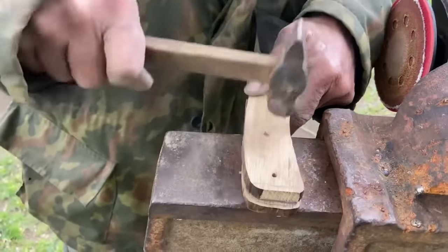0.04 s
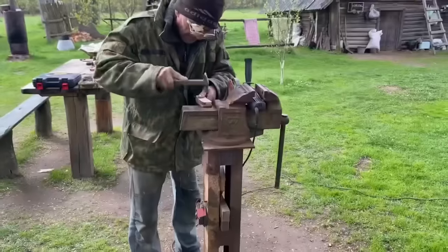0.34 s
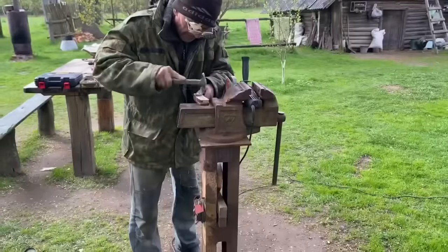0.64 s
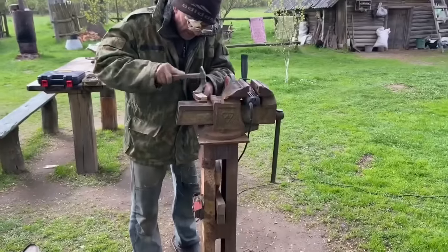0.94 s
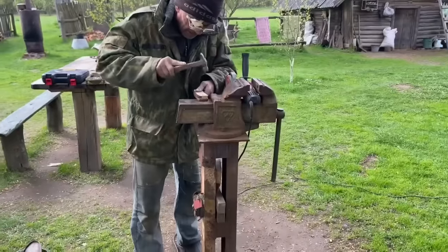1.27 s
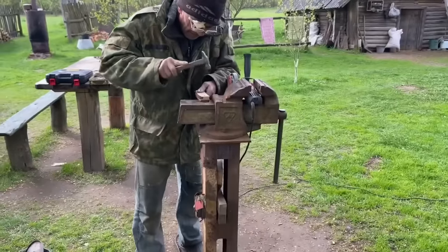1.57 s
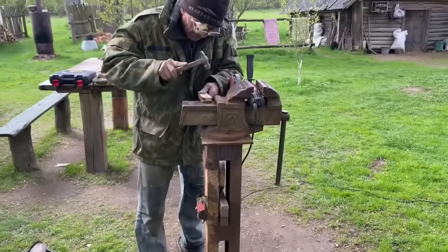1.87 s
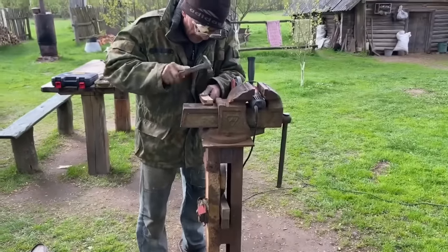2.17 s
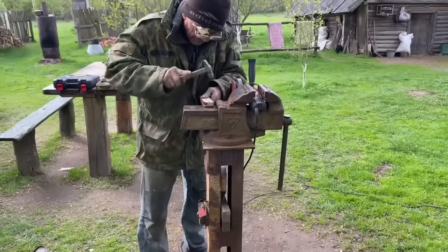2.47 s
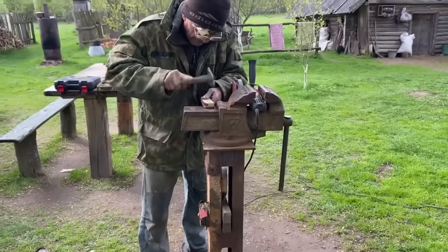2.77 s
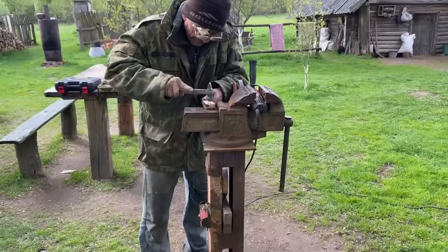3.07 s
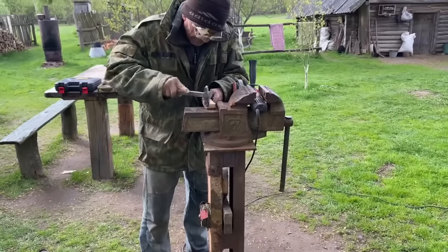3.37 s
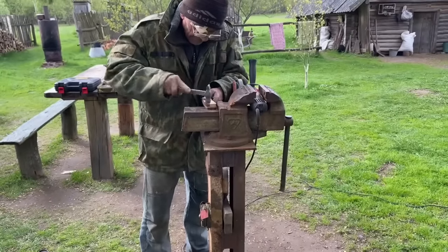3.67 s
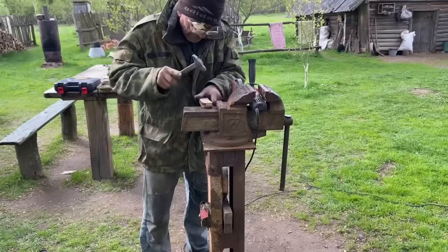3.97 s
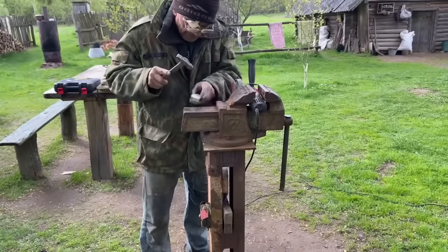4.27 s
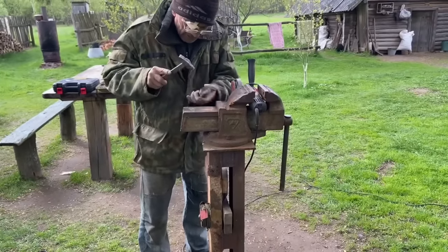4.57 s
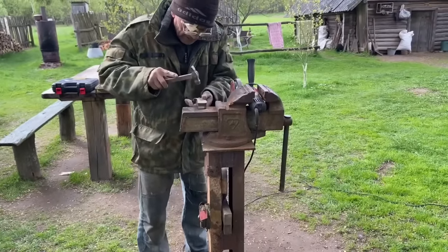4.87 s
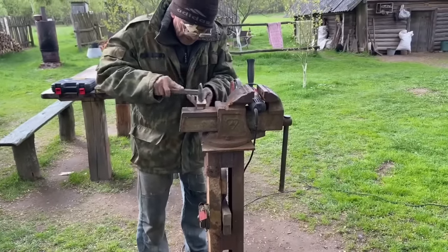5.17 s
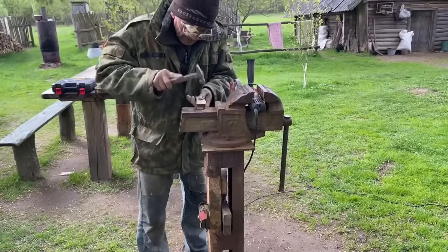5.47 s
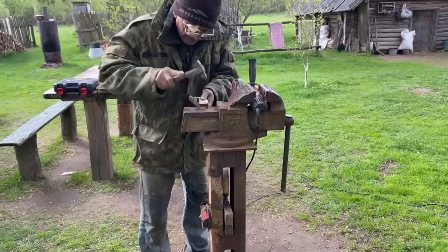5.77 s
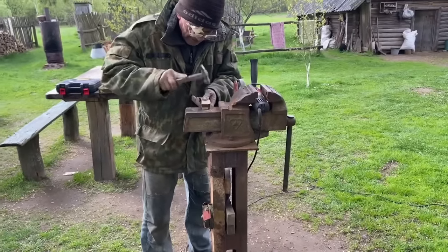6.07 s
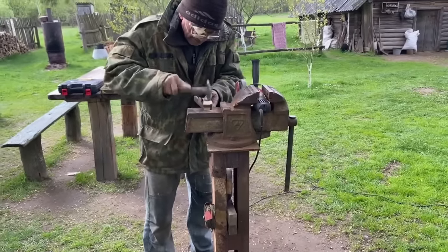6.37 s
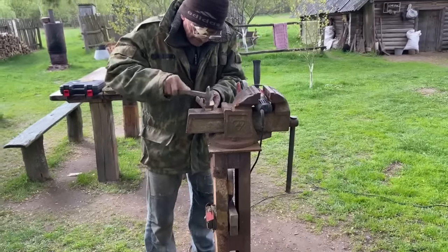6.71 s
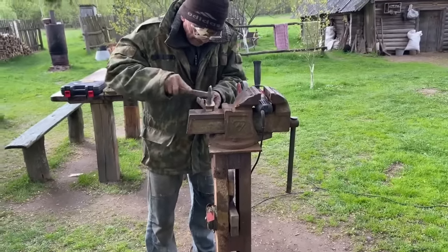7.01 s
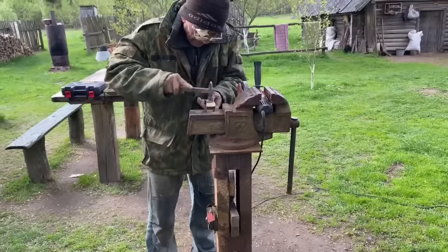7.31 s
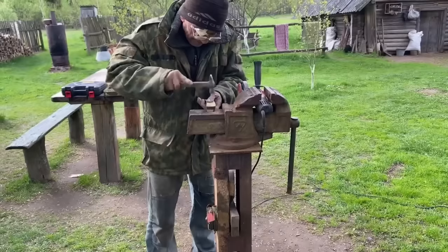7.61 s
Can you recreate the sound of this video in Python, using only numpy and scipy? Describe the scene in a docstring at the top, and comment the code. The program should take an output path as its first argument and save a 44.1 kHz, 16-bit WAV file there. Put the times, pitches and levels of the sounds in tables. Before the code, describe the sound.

Steady, sharp hammer taps ring briefly on a metal vise, stop for a moment and resume, over light wind on the microphone.

```python
"""Peening rivets in the yard

A small hammer peens rivets in a wooden handle laid on a steel bench vise. Each tap is a hard clack
and a short ring of hammer and vise, thrown back faintly by the yard; after some the handle bounces.
Light wind buffets the microphone, a far bird whistles and a sleeve rustles in the pause."""
import sys
import numpy as np
from scipy import signal
from scipy.fft import rfft, irfft
from scipy.io import wavfile

SR = 44100
rng = np.random.default_rng(int(sys.argv[2]) if len(sys.argv) > 2 else 0)


def unload_audio(sound):
    """Save the sound as a 16-bit wav file, at the path given as the first command line argument."""
    columns = np.transpose(np.atleast_2d(sound))
    # keep every value between -1 and 1, then stretch to whole-number steps
    steps = np.round(np.clip(columns, -1, 1) * 32767)
    wavfile.write(sys.argv[1], SR, steps.astype(np.int16))


N = 346166
TIME = np.arange(N) / SR

# Tone curves for open air, wind rumble, the clack of steel on rivet and wood, and rubbing cloth.
# Each row: frequency in Hz, relative level in dB.
AIR_EQ = [(200, -19.5), (700, 5), (1500, -5.5), (4000, -10), (7500, -12), (11500, -27), (13000, -44)]
RUMBLE_EQ = [(12, -48), (22, -31.5), (52, -6.5), (76, -2.5), (112, -8), (251, -15), (497, -32),
             (536, -38.5), (603, -44), (700, -35.5), (910, -63), (1540, -120)]
CLACK_EQ = [(100, -22.5), (250, -14), (600, -7.5), (1000, -2.5), (1400, -2.5), (1800, 0), (2800, 1),
            (4500, -2), (5600, -4), (7000, -6.5), (8800, -11), (10500, -9), (12000, -12), (13500, -35),
            (16000, -30.5)]
CLOTH_EQ = [(300, -12), (700, 0.5), (1600, -4), (3800, -1), (5400, -3), (7200, 2), (8700, -9),
            (10500, -4.5), (12000, -9), (13000, -29), (16000, -27.5)]
# The same columns for the wind's eddies, its lumpy wobble and the flutter of the cloth.
EDDY_EQ = [(60, -29.5), (160, 1.5), (300, -10), (480, -18.5), (800, -45.5), (3000, -83.5)]
LUMP_EQ = [(1, -25), (6, -14), (14, -1), (25, -0.5), (60, -45), (200, -120)]
FLUTTER_EQ = [(1, -3), (40, -3), (150, -24.5), (400, -120)]
# Sudden low puffs. Each row: start in seconds, level in dB, length in seconds, rough pitch in Hz.
WIND_PUFFS = [(0.167, -39, 0.017, 93), (2.338, -36, 0.037, 213), (2.595, -31, 0.024, 212),
              (2.795, -27.5, 0.0061, 159), (4.014, -36.5, 0.019, 232), (4.126, -39, 0.01, 315),
              (6.498, -28, 0.0078, 323), (6.507, -31.5, 0.022, 86), (6.638, -26.5, 0.013, 101)]
# Gusts on the microphone. Each row: start in seconds, length in seconds, level in dB.
WIND_GUSTS = [(.17, 0.26, -48), (.54, 0.058, -51), (.66, 0.027, -44.5), (.96, .57, -54), (1.71, .11, -43),
              (2.01, 0.13, -45), (2.26, 0.51, -42), (2.87, .23, -52), (3.36, .36, -56), (4.01, 0.16, -47.5),
              (4.41, 0.2, -42.5), (4.67, 0.088, -41), (4.98, .17, -43.5), (5.22, 0.074, -44),
              (5.44, 0.22, -46.5), (5.97, 0.19, -44), (6.28, 0.16, -47.5), (6.5, 0.24, -39),
              (6.8, .17, -44.5), (7.1, 0.76, -49), (7.44, 0.062, -41)]
# Hammer taps; the rings depend on how the face lands.
# Each row: start in seconds, force in dB, main ring trim in dB, upper ring trim in dB.
HAMMER_TAPS = [(0.2487, -3.4, -2.5, 6), (0.5449, -2, -1.5, 6.5), (0.837, -0.9, -4, 5.5),
               (1.1199, -0.5, -5, 6.5), (1.4034, -1.8, -4.5, 6), (1.6908, -0.1, -6, 1.5),
               (1.9875, 2, -5, 5), (2.26, 2, -3.5, 0), (2.541, 2.5, -2.5, -2.5), (2.8177, 3, -1, -1),
               (3.0862, 4, -2, -2), (3.357, 3, -4, -9), (3.6353, 4.5, -2, -15), (5.1873, -6.5, -2, -12.5),
               (5.5111, 3, 2, 4), (5.8159, 2.5, -1.5, 2.5), (6.1112, 2.5, -0.5, 2.8), (6.3863, 2, -1.3, 3),
               (6.6625, 2.5, -2, 3.5), (6.933, 3.5, -1, 5), (7.2139, 2, 0.5, 6), (7.483, 1.9, 0.5, 6),
               (7.7313, 1.5, 2, 4)]
# Each rivet's colour. Each row: start of work in seconds, then low ring, clack and tick trims in dB.
RIVET_TONES = [(0, 3, -6, -5.4), (4.5, -2.5, -2.5, -5)]
# Modes of hammer and vise.
# Each row: pitch in Hz, relative level in dB, t60 before hand damping in seconds, swell in ms.
STEEL_MODES = [(491, -31, 0.13, 0.5), (749.4, -26, 0.11, 1.5), (802.6, -23.5, 0.05, 1),
               (964.6, -28, 0.068, 1.2), (992.5, -23, 0.066, 0.81), (1197, -25, 0.18, 4),
               (1308, -9, 0.025, 2), (1379, -8, 0.026, 1.4), (1498, -22, 0.03, 1.1),
               (1972, -17.5, 0.05, 1.1), (2075, -9, 0.099, 1.4), (2119.4, -6, 0.036, 1.5),
               (2315.4, -11, 0.068, 4.1), (2489, -17, 0.059, 4.2), (2680, -25.5, 0.16, 0.36),
               (2877, -13, 0.037, 0.29), (3250, -13, 0.022, 0.18), (3414, -15.5, 0.035, 0.17),
               (3560, -22, 0.082, 0.3), (3824, -23.5, 0.15, 0.4), (4003, -21.5, 0.082, 0.4),
               (4144, -23.5, 0.12, 0.4), (4578, -17, 0.095, 0.4), (4732, -14, 0.029, 0.96),
               (5006, -11.5, 0.018, 0.18), (6195, -24.5, 0.12, 0.3), (6520, -28.4, 0.11, 0.47),
               (7190, -23.5, 0.081, 0.64), (11660, -58.5, 0.75, 0.4)]
# The microphone's two ports. Each row: frequency in Hz, left's lead in radians, left over right in dB.
PORT_IMAGE = [(298, 0.13, -1), (540, 2.5, 3), (756, .5, 4), (1150, 1.5, -0.5), (1464, -1.6, 4.5),
              (1662, 1.67, -3), (1840, 4.5, -1.5), (2230, 5, -1), (2300, 8.5, 3.5), (3130, 8, 4),
              (3920, 6.5, -1), (5350, 8.5, -1), (7600, 7, -0.5), (8480, 12, 3.5), (11930, 3, 1),
              (12500, 8, -2.5)]
# The tail from the trees. Each row: frequency in Hz, relative level in dB, t60 in seconds.
TREE_TAIL = [(200, 7, 0.31), (695, 6.5, 0.34), (1370, -11.5, 0.78), (2180, 3, 0.42), (3500, -4.5, 0.61),
             (6900, 2.5, 0.38), (11130, -7, 0.47), (13460, -24.5, 0.23)]
# Echoes off bench, table and sheds. Each row: delay in seconds, level in dB, t60 in seconds.
YARD_ECHOES = [(0.0164, -15.5, 0.026), (.026, -22.5, .06), (0.0656, -34, .015), (.072, -39, .12),
               (.087, -36, 0.046)]
# The handle jumps and drops back on the vise. Each row: landing in seconds, force in dB.
HANDLE_BOUNCES = [(.2655, -24), (2.014, -17.5), (2.283, -12.5), (2.849, -15), (6.4107, -21), (6.692, -26),
                  (6.959, -15.5), (7.241, -19.5), (7.5089, -8), (7.756, -14)]
# A far bird. Each row: start in seconds, length in seconds, pitch in Hz, level in dB.
WHISTLES = [(2.467, 0.21, 4800, -64), (3.236, 0.27, 3780, -60), (3.54, 0.046, 4680, -68),
            (3.86, 0.17, 3760, -64.5)]
# The jacket rubs as the hands shift. Each row: start in seconds, length in seconds, level in dB.
SLEEVE_RUBS = [(3.84, .22, -66.5), (4.28, 0.26, -58.5), (4.58, .08, -59.5), (4.78, .22, -65.5),
               (5.08, 0.19, -59), (5.43, .12, -55)]


def amp(db):
    """Decibels to gain."""
    return 10 ** (np.asarray(db) / 20)


def unit_rms(x):
    """Scales to rms 1."""
    return x / np.sqrt(np.mean(x ** 2) + 1e-20)


def curve(points, hz, column=1):
    """One column of a table, interpolated on a log-frequency axis."""
    table = np.transpose(points)
    return np.interp(np.log(hz + 1), np.log(table[0] + 1), table[column])


def add(mix, start, sound):
    """Drops a sound into the mix at a start in seconds."""
    part = mix[..., max(round(start * SR), 0):][..., :sound.shape[-1]]
    part += sound[..., :part.shape[-1]]


def colour(x, eq, size=2048):
    """Minimum-phase EQ, so that attacks stay sharp."""
    log_gain = np.log(amp(curve(eq, np.fft.rfftfreq(size, 1 / SR))))
    mirrored = np.concatenate([log_gain, log_gain[-2:0:-1]])
    impulse = np.fft.ifft(np.exp(np.conj(signal.hilbert(mirrored)))).real[:size // 2]
    return signal.fftconvolve(x, impulse)[:len(x)]


def noise(eq):
    """Steady shaped noise, unrelated left and right."""
    gain = amp(curve(eq, np.fft.rfftfreq(N, 1 / SR)))
    return unit_rms(irfft(rfft(rng.standard_normal((2, N))) * gain, N))


def swells(events, rise_s, fall_s, rest_db):
    """Envelope of events that rise, hold and die away over a resting level."""
    power = amp(rest_db) ** 2
    for start, length, db in events:
        attack = np.clip((TIME - start) / rise_s, 0, 1)
        release = np.exp(-np.clip((TIME - start - length) / fall_s, 0, 20))
        power = power + (amp(db) * attack * release) ** 2
    return np.sqrt(power)


def air(db=-68, opening_db=-7):
    """A quiet bed of open air, stiller in the first moment."""
    return noise(AIR_EQ) * amp(db + np.interp(TIME, [.16, .2], [opening_db, 0]))


def dying_ring(hz=1200, db=-36, t60=0.15, scatter_db=-47, scatter_t60=0.24):
    """The scene opens on the fading low ring and scatter of an earlier tap."""
    t = np.minimum(TIME, 1)
    scatter = amp(scatter_db - 60 * t / scatter_t60) * colour(rng.standard_normal(N), CLACK_EQ)
    return amp(db - 60 * t / t60) * np.sin(2 * np.pi * hz * TIME) + scatter


def puffs():
    """Short, low thumps of air on the microphone."""
    out = np.zeros((2, N))
    t = np.arange(SR // 4) / SR
    for start, db, length, hz in WIND_PUFFS:
        band = signal.butter(3, [hz / 2, hz * 1.344], "band", fs=SR, output="sos")
        burst = rng.standard_normal((2, len(t))) * (t / length) * np.exp(-2 * t / length)
        add(out, start, amp(db) * unit_rms(signal.sosfilt(band, burst)) * np.sqrt(length / t[-1]))
    return out


def wind(lump_db=3.5, eddy_db=-11, eddy_growth=1.3, strong_db=-30, crossfeed=.12):
    """Lumpy rumble, partly shared by the ports; stronger gusts shed smaller, higher eddies."""
    fade_in = np.clip((TIME - 0.171) / 0.018, .05, 1)
    level = swells(WIND_GUSTS, rise_s=0.018, fall_s=0.02, rest_db=-56.5) * fade_in
    lumps = unit_rms(amp(lump_db * noise(LUMP_EQ)))
    eddies = noise(EDDY_EQ) * amp(strong_db + eddy_db) * (level / amp(strong_db)) ** eddy_growth
    rumble = noise(RUMBLE_EQ + [(2000, -92)]) * level
    pair = lumps * (rumble + eddies)
    return pair + crossfeed * pair[::-1]


def hammer():
    """The taps and the handle's bounces, close up and thrown back by the yard."""
    direct, thrown_back = dying_ring(), np.zeros((2, N))
    grain = rng.standard_normal(SR // 2)  # the dense, quickly damped modes of the wooden handle
    taps = [(start, force_db, tap_tone(start, force_db, main_db, upper_db))
            for start, force_db, main_db, upper_db in HAMMER_TAPS]
    bounce_tone = dict(low_db=-6, main_db=-6, upper_db=-6, clack_db=2.5, tick_db=-4)
    bounces = [(start, force_db, bounce_tone) for start, force_db in HANDLE_BOUNCES]
    for start, force_db, tone in taps + bounces:
        hit = amp(force_db) * blow(grain, **tone)
        add(direct, start, hit)
        add(thrown_back, start, yard(hit))
    return ports(direct) + thrown_back


def tap_tone(start, force_db, main_db, upper_db):
    """The rivet colours a tap; harder blows reach deeper into the vise and sound brighter."""
    _, low_db, clack_db, tick_db = [rivet for rivet in RIVET_TONES if rivet[0] <= start][-1]
    return dict(low_db=low_db + 0.27 * force_db, main_db=main_db, upper_db=upper_db,
                clack_db=clack_db + 0.35 * force_db, tick_db=tick_db + 0.5 * force_db)


def blow(grain, low_db, main_db, upper_db, clack_db, tick_db, ring_db=-2, likeness=0.59):
    """One hit: a crack of contact and a brief rattle, partly alike each time, plus the ring."""
    t = np.arange(len(grain)) / SR
    brightness = [(1500, 0), (3000, clack_db), (5200, clack_db), (7500, tick_db)]
    crack = amp(-9) * np.exp(-t / 0.0024)
    rattle = amp(-18) * np.exp(-t / 0.0087)
    texture = likeness * grain + np.sqrt(1 - likeness ** 2) * rng.standard_normal(len(t))
    clack = colour(colour(2 * (crack + rattle) * texture, CLACK_EQ), brightness)
    mode_hz = np.transpose(STEEL_MODES)[0]
    trims_db = curve(brightness, mode_hz)
    for hz, db in (1200, low_db), (2080, main_db), (2115, main_db), (2325, upper_db):
        trims_db[np.argmin(abs(mode_hz - hz))] = db
    return clack + ring(t, trims_db + ring_db)


def ring(t, trims_db, spread_db=0.84, detune=0.0022):
    """The modes swell as the blow spreads through the steel, then die; the grip detunes them a touch."""
    hz, db, t60, swell_ms = np.transpose(STEEL_MODES)[:, :, None]
    t60 = t60 * np.where(hz > 2600, 0.68, 1)  # the hand on the work damps the high modes
    level_jitter, pitch_jitter, phase_jitter = rng.standard_normal((3, len(STEEL_MODES), 1))
    attack = 1 - np.exp(-t / (swell_ms / 1000))
    decay = amp(db + trims_db[:, None] + spread_db * level_jitter - 60 * t / t60)
    phase = 2 * np.pi * hz * (1 + detune * pitch_jitter) * t + phase_jitter * hz / 3000
    return (attack * decay * np.sin(phase)).sum(0)


def ports(x, size=256):
    """Stereo image: the housing gives each microphone port its own phase and level."""
    hz = np.fft.rfftfreq(size, 1 / SR)
    left = np.exp(.5j * curve(PORT_IMAGE, hz)) * amp(curve(PORT_IMAGE, hz, column=2) / 2)
    impulses = np.fft.fftshift(irfft(np.array([left, 1 / left])), axes=1)
    impulses *= signal.windows.tukey(size, .5)
    return signal.fftconvolve(x[None], impulses, axes=1)[:, size // 2:][:, :N]


def yard(x, ground_db=-17, ground_t60=0.19, trees_db=-28, build_s=0.043):
    """Scatter from the ground, a few rough echoes and a faint tail from the trees."""
    t = np.arange(SR // 2) / SR
    ground, trees, *walls = rng.standard_normal((2 + len(YARD_ECHOES), 2, len(t)))
    hz, frame_s, spectrum = signal.stft(trees * np.minimum(t / build_s, 1), SR, nperseg=256)
    tail_db = curve(TREE_TAIL, hz)[:, None] - 60 * frame_s / curve(TREE_TAIL, hz, column=2)[:, None]
    tail = signal.istft(spectrum * amp(tail_db), SR, nperseg=256)[1][:, :len(t)]
    response = amp(trees_db) * unit_rms(tail)
    echoes = [(.005, ground_db, ground_t60)] + YARD_ECHOES
    for scatter, (delay, db, t60) in zip([ground] + walls, echoes):
        response += amp(db) * unit_rms(scatter * amp(-60 * abs(t - delay) / t60) * (t > delay))
    return signal.fftconvolve(x[None], response / np.sqrt(len(t)), axes=1)


def bird(blur=.02):
    """Thin whistles, smeared on their way through the trees."""
    out = np.zeros((2, N))
    for start, length, hz, db in WHISTLES:
        t = np.arange(int(length * SR)) / SR
        band = signal.butter(2, [hz * (1 - blur), hz * (1 + blur)], "band", fs=SR, output="sos")
        note = unit_rms(signal.sosfilt(band, rng.standard_normal((2, len(t)))))
        add(out, start, amp(db) * note * np.sin(np.pi * np.sqrt(t / length)))
    return out


def sleeve(flutter_db=2, arm_db=-76.5):
    """Cloth on cloth: a hiss that catches and slips, over the faint rustle of the working arm."""
    flutter = amp(flutter_db * noise(FLUTTER_EQ))
    return noise(CLOTH_EQ) * flutter * swells(SLEEVE_RUBS, rise_s=0.067, fall_s=0.056, rest_db=arm_db)


def scene():
    """Taps and their echoes up front, over wind, cloth, open air and the bird."""
    return hammer() + wind() + puffs() + sleeve() + air() + bird()


def record(dry, ceiling=.9, cutoff_hz=16500):
    """A soft clip rounds the loudest peaks; a steep low-pass trims the very top."""
    rounded = ceiling * np.tanh(dry / ceiling)
    lowpass = signal.firwin(255, cutoff_hz, window=("kaiser", 9), fs=SR)
    return signal.oaconvolve(rounded, lowpass[None], "same")


dry = scene()
out = record(dry)
unload_audio(out)
```